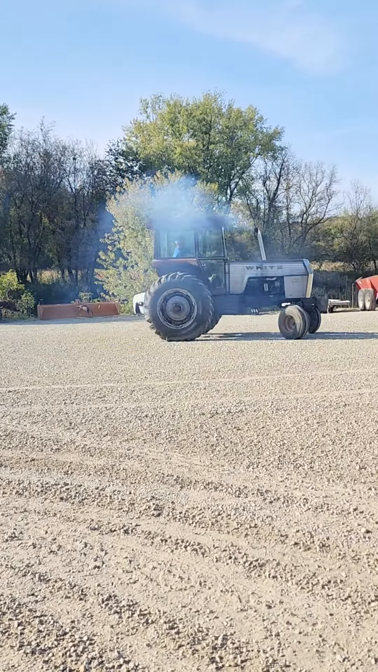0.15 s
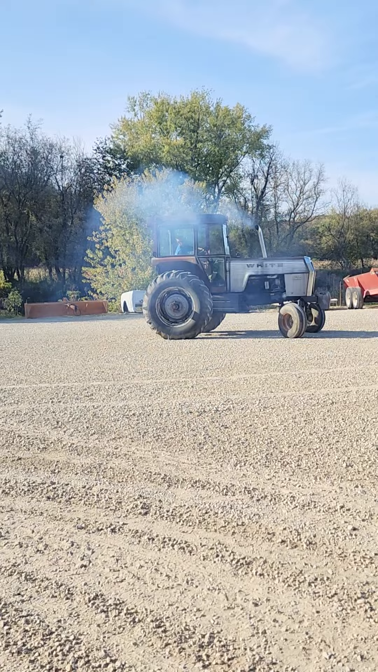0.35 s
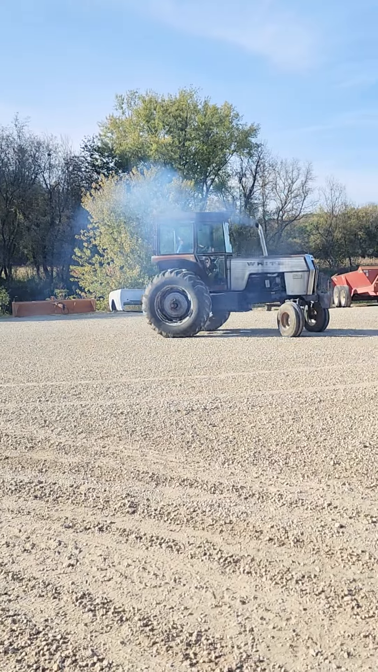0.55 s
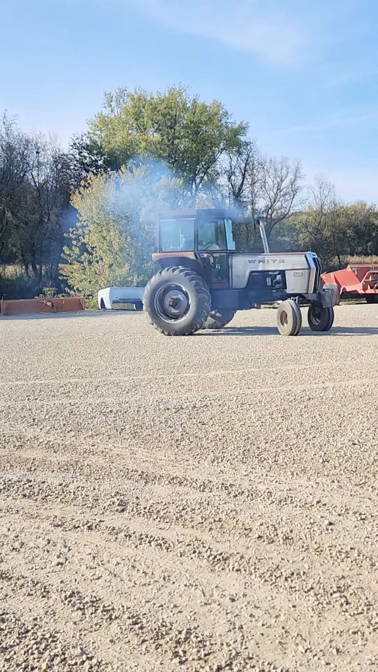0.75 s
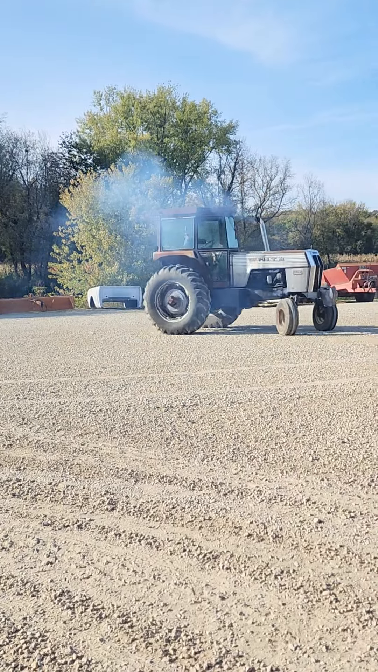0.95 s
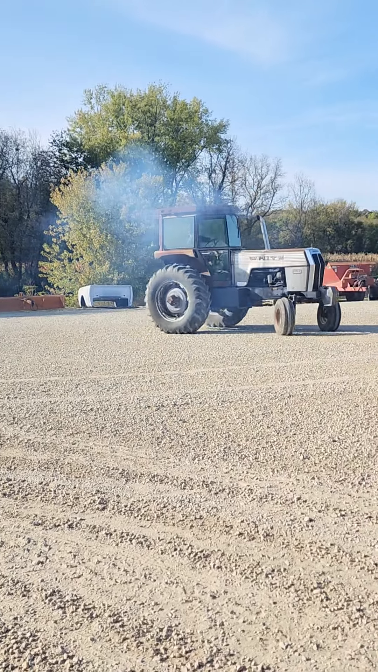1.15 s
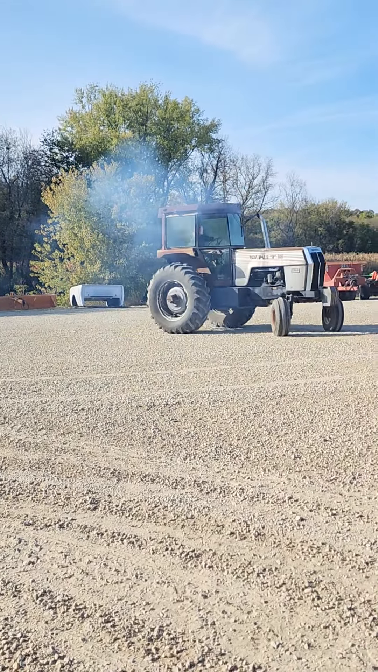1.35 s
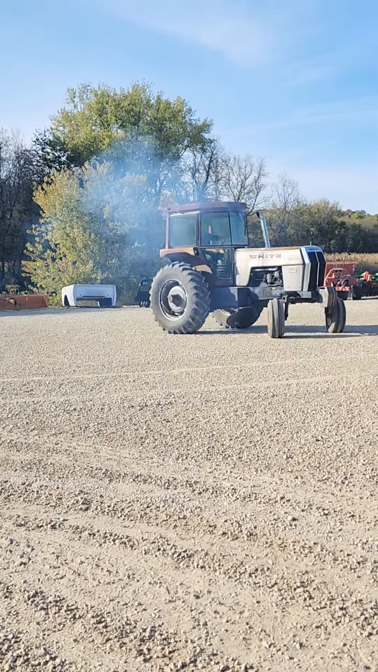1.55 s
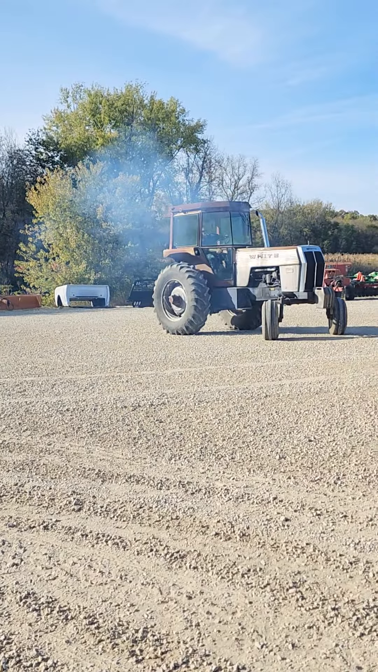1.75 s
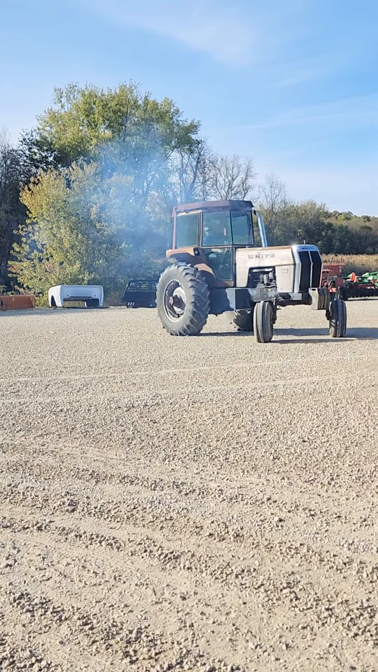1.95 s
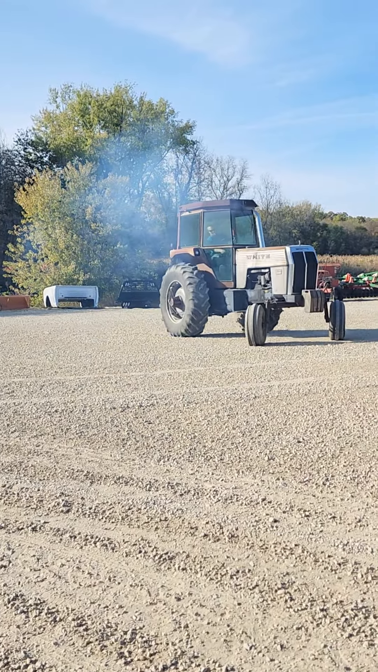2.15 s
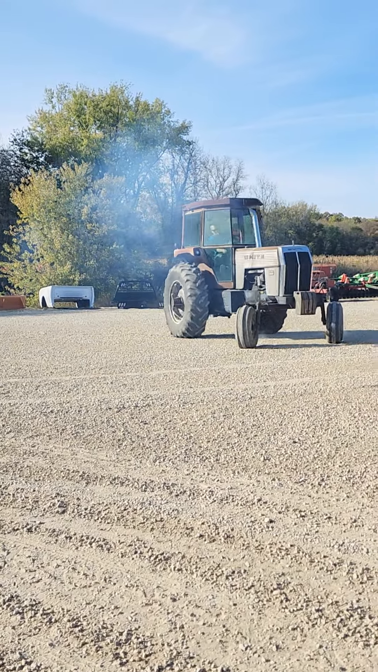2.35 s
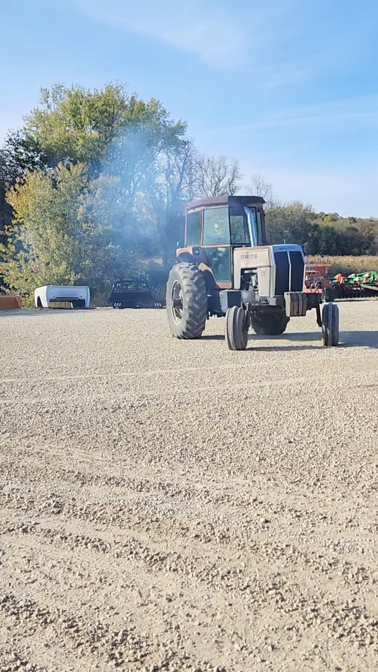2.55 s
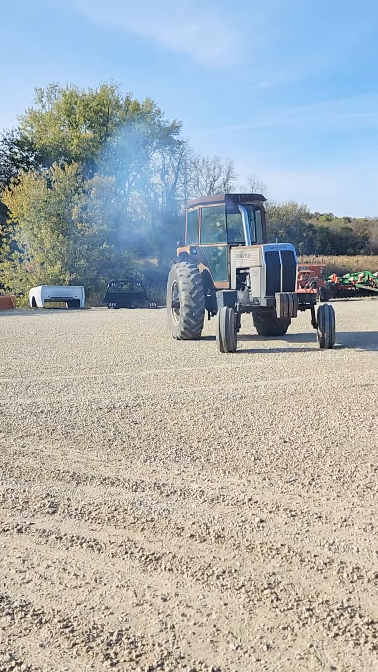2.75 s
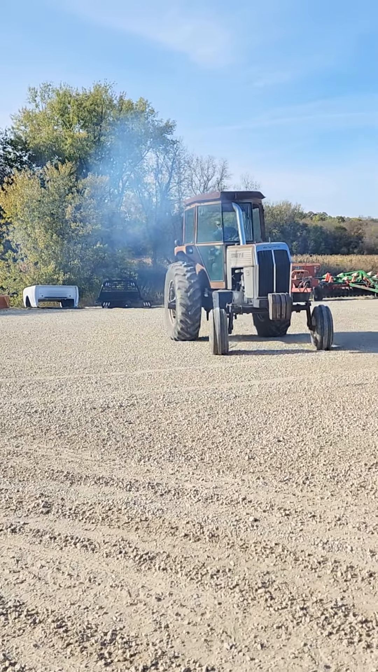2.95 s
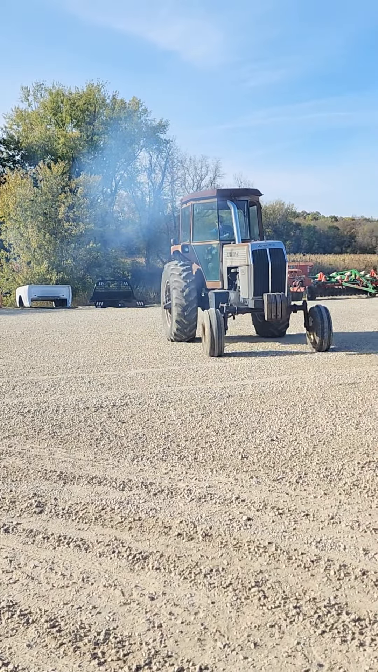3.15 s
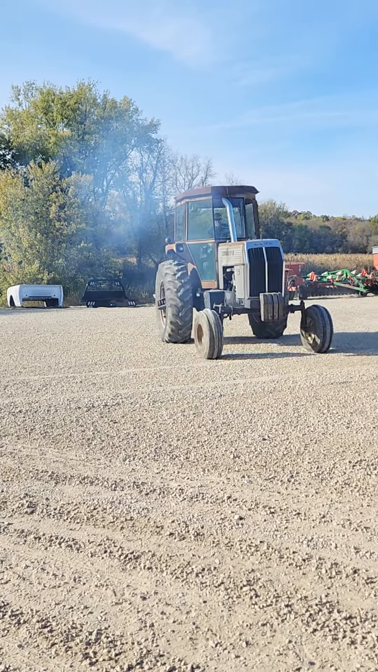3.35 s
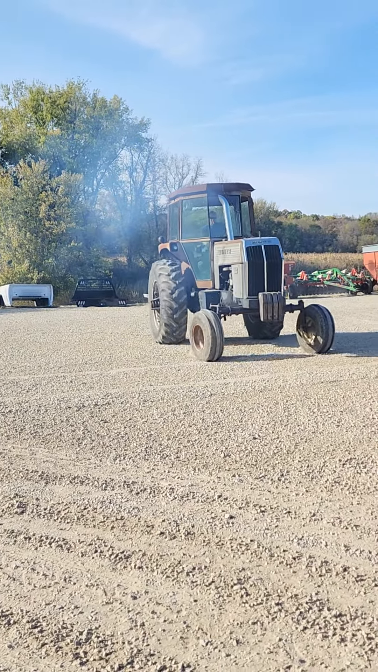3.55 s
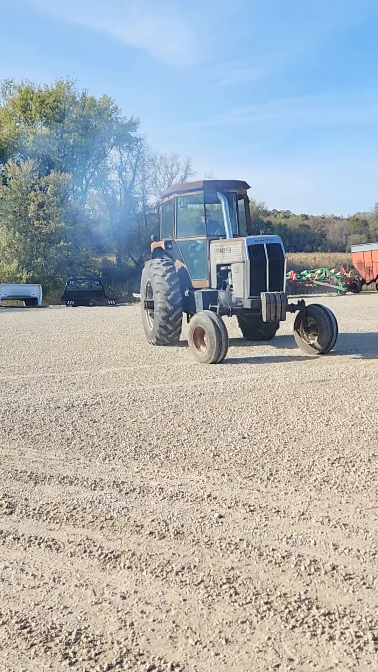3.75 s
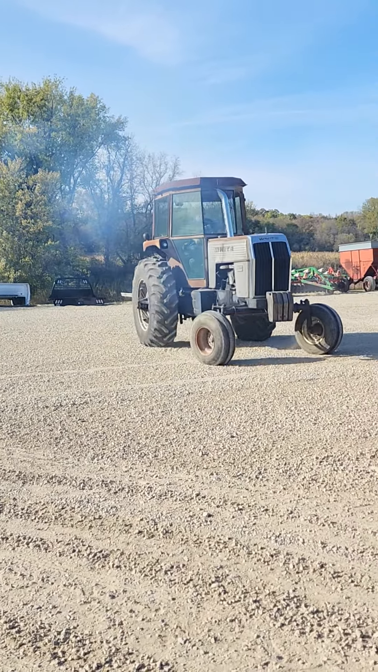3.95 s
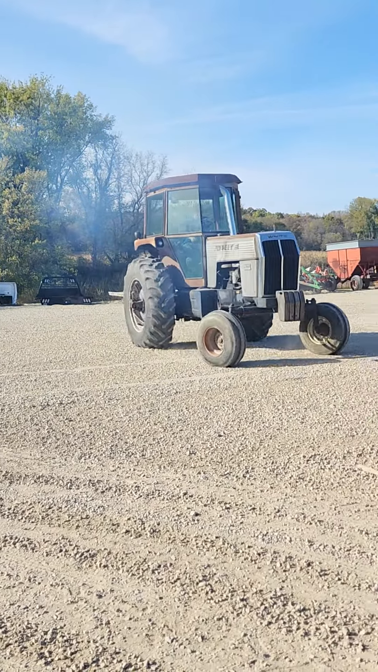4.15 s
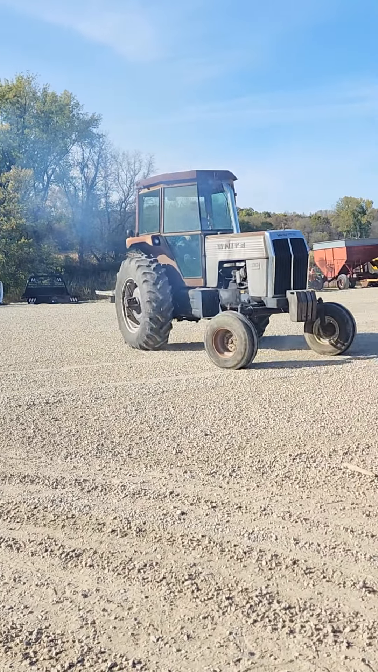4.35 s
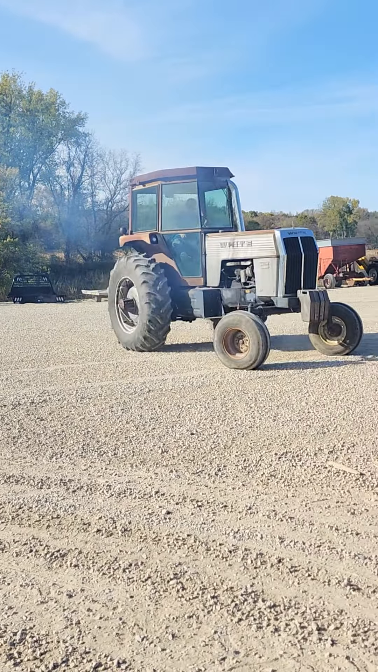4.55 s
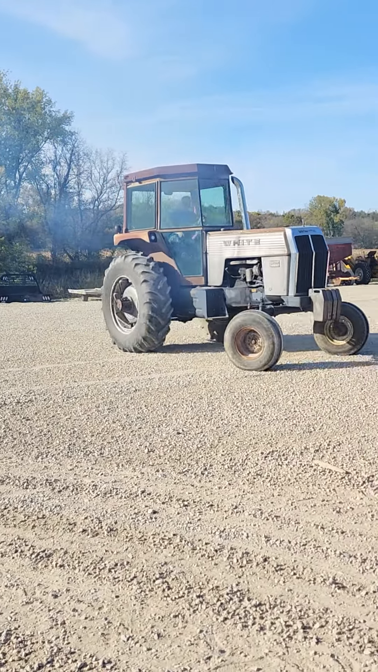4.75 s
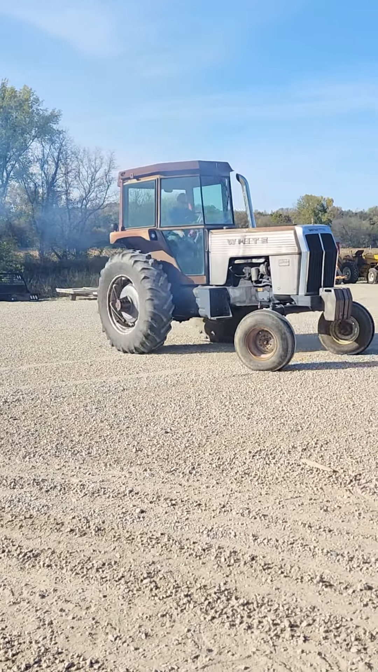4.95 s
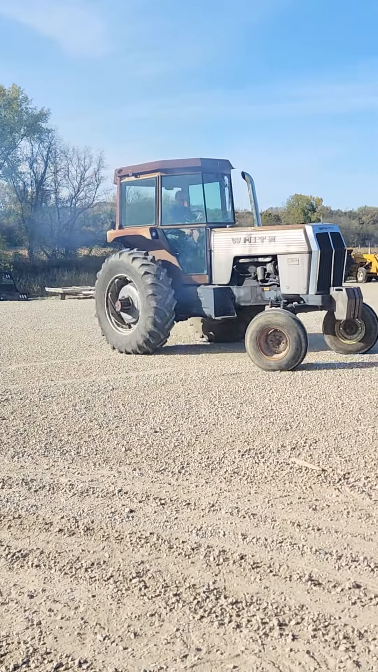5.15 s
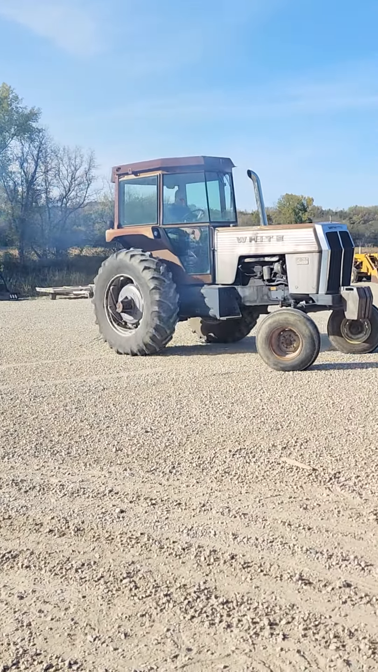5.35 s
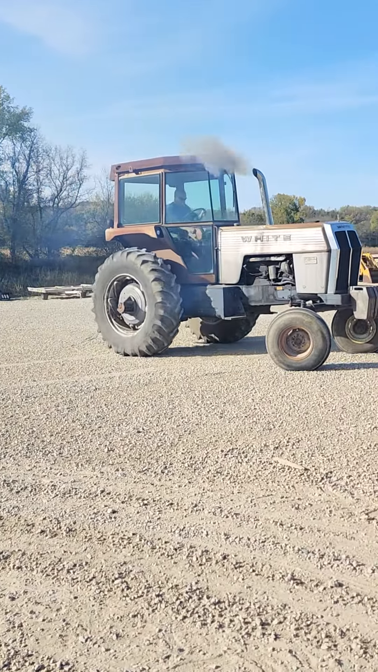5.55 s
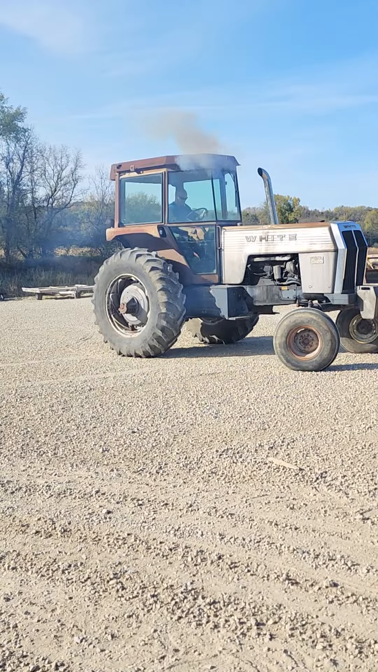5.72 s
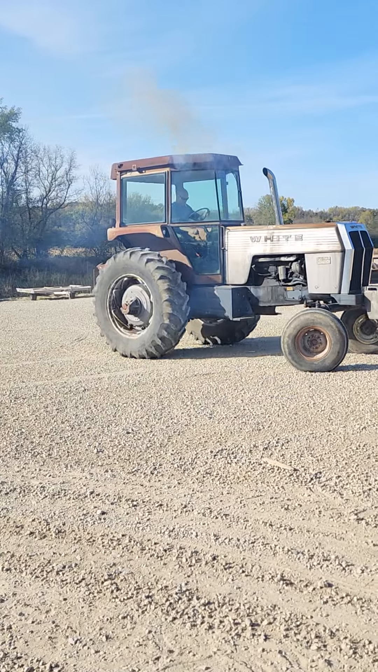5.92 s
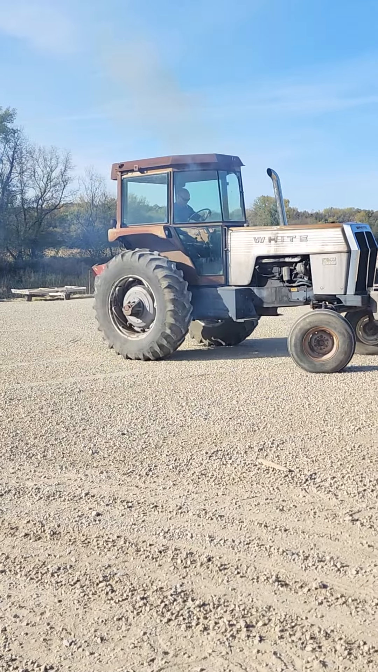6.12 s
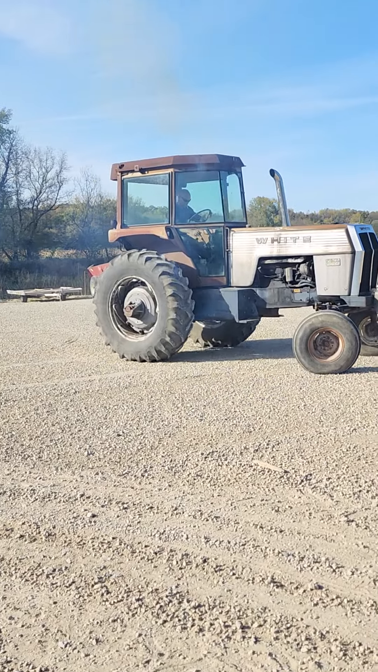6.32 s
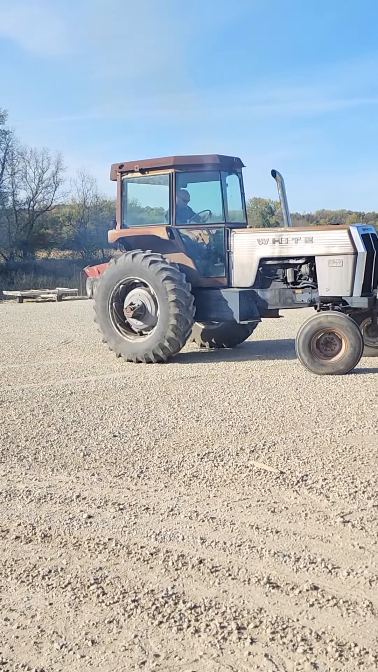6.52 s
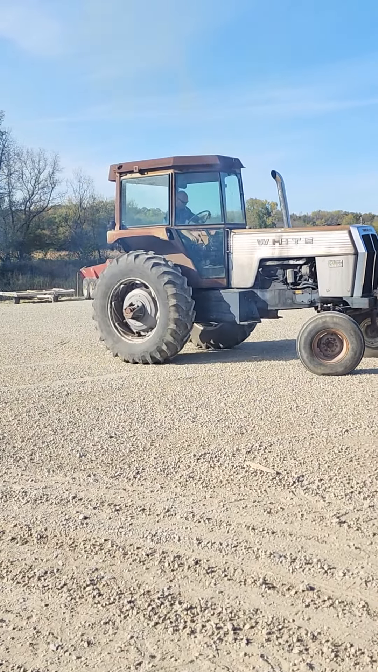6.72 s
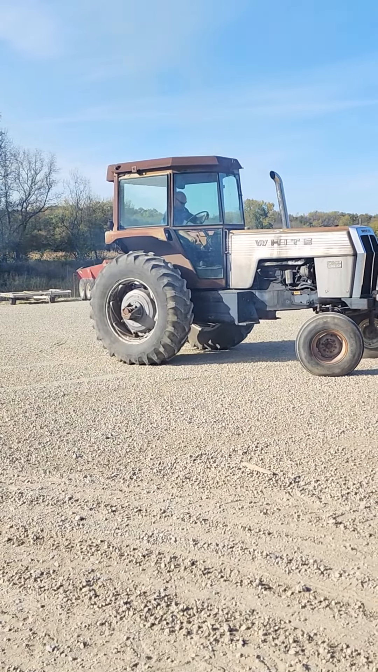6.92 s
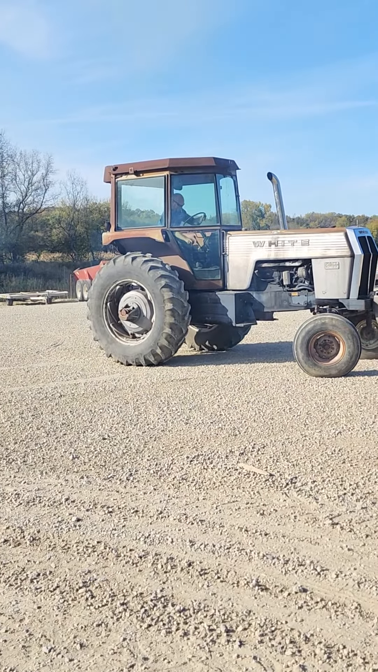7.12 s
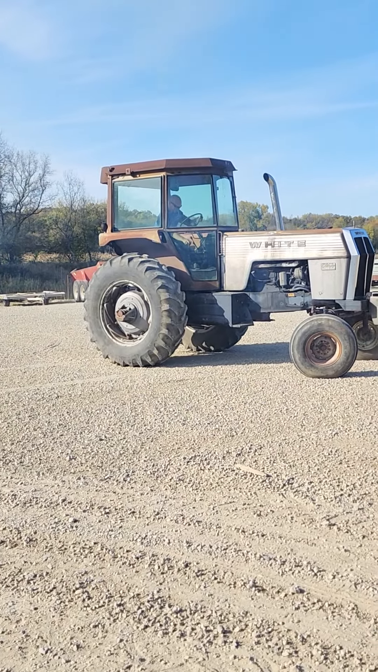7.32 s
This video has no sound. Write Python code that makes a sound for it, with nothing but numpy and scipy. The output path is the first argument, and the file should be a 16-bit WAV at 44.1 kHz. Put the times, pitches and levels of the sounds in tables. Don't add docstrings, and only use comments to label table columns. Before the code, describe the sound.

Outdoors, a steady loud diesel drone with hissing, spitting exhaust gas, a short rev, then falling engine pitch and a whine winding down.

```python
import sys
import numpy as np
from scipy import signal
from scipy.fft import rfft, irfft, next_fast_len
from scipy.io import wavfile
from scipy.ndimage import uniform_filter1d, map_coordinates

SR = 44100
rng = np.random.default_rng(int(sys.argv[2]) if len(sys.argv) > 2 else 0)


def voltage_ratio(decibels):
    exponent = np.asarray(decibels, float) / 20
    return 10 ** exponent


def put_to_file(sound):
    columns = np.atleast_2d(sound).T
    safe = np.clip(columns, -1, 1)
    whole_steps = np.round(safe * 32767)
    wavfile.write(sys.argv[1], SR, whole_steps.astype(np.int16))


N = 329868
T = np.arange(N) / SR

# time in seconds, firing rate in Hz.
FIRING_RATE = [(0, 82.7), (.4, 81.9), (.9, 82.3), (2.4, 82.15), (3, 82.9), (4.2, 83.05), (4.55, 84.4),
               (5.1, 84.4), (5.38, 85.5), (5.5, 93.5), (5.6, 97.8), (5.72, 99.5), (6.15, 76.3),
               (6.45, 63.3), (6.75, 54.5), (7, 49), (7.2, 48.45), (7.48, 49.86)]
# time in seconds, nearness and effort in dB,
# open flank towards the phone (0-1 or a little over), coasting (0-1).
LOAD = [(0, -24, 0.63, 0), (.6, -23.5, 0.86, 0.23), (1.1, -24.5, 0.92, .12), (1.7, -24.5, 0.94, 0.2),
        (2.4, -25, 0.53, 0), (3.2, -24.5, 0.22, 0.17), (4, -23, 0.45, 0.03), (4.8, -22.5, 0.32, 0.42),
        (5.3, -22.5, 0.77, 0.34), (5.38, -23, .5, 0.43), (5.45, -21.5, 1.2, .2), (5.56, -28.5, 1.4, 0),
        (5.65, -25.5, 0.98, 0.9), (6, -25.5, .8, 0.93), (6.45, -30.5, 0.56, 0.97), (6.75, -31, 0.54, 0.97),
        (7.05, -33, 0.6, 0.83), (7.47, -31, 0.52, 0.8)]
CYLINDER_PUFF_DB = [-1, 1, 0, 2, 3, -1]


def evened(x):
    return x / np.sqrt(np.mean(x ** 2) + 1e-20)


def read(points, hz):
    f, value = np.transpose(points)
    return np.interp(np.log(hz + 1), np.log(f + 1), value)


def curves(rows):
    s, *columns = np.transpose(rows)
    return [np.interp(T, s, column) for column in columns]


def noise():
    return rng.standard_normal(N)


def colour(x, points):
    size = next_fast_len(N)
    gain = voltage_ratio(read(points, np.fft.rfftfreq(size, 1 / SR)))
    return evened(irfft(rfft(x, size) * gain, size)[:N])


def wander(hz):
    knots = rng.standard_normal(2000)
    coarse = T[::32]
    drift = map_coordinates(knots, [coarse * 2 * hz], order=3)
    return np.interp(T, coarse, evened(drift))


def resonate(x, hz, width):
    pole = np.exp((2j * hz - width) * np.pi / SR)
    return evened(signal.lfilter([1], [1, -pole], x).real)


def crank():
    return -.445 + np.cumsum(curves(FIRING_RATE)[0]) / SR


def slowing():
    return np.log2(curves(FIRING_RATE)[0] / 83)


def valve_gate(late, pattern_db, scatter_db, fall):
    turns = crank() - late + 6
    firing, part = turns.astype(int), turns % 1
    chance_db = scatter_db * rng.standard_normal(2000)[firing]
    size = voltage_ratio(np.asarray(pattern_db)[firing % 6] + chance_db)
    return evened(size * (1 - np.exp(-part / .09)) * np.exp(-part / fall))


def bump():
    s, db, length_s = .405, -6, 0.0026
    return voltage_ratio(db) * np.exp(-((T - s) / length_s) ** 2)


def roar():
    # frequency in Hz, level in dB.
    roar_colour = [(20, -37), (45, -26), (80, 3), (150, 1), (220, -3), (330, -8), (500, -10.5), (900, -44)]
    level_db, flank, coasting = curves(LOAD)
    scrub = np.clip((T - 1.54) / 0.34, 0, 1)
    level_db = level_db - 4 - 0.5 * flank - 2 * coasting + 3.5 * scrub
    return voltage_ratio(level_db + 0.81 * wander(6)) * colour(noise(), roar_colour)


def fan():
    order = 1.557
    level = voltage_ratio(-33 - 23 * abs(slowing()) + 0.9 * wander(0.93))
    return np.sqrt(2) * level * np.cos(2 * np.pi * order * crank() + 1.2)


def block():
    knock_db = [-1, -1, -2, 1, 4, 1]
    # frequency in Hz, level in dB.
    loaded_colour = [(200, -7), (350, -6), (480, -4), (650, 1.5), (1000, -1), (1230, -8), (1570, -1),
                     (1800, -9), (2070, -8.5), (2500, -10), (3000, -20), (4000, -9), (7000, -49)]
    # frequency in Hz, level in dB.
    coasting_colour = [(200, -3), (350, -9.5), (480, -0.5), (650, -3), (1000, 0.5), (1230, -18),
                       (1500, 4.5), (1800, -13.5), (2070, -9.5), (2400, -16.5), (3000, -10.5), (3700, -9.5),
                       (5000, -15.5), (8000, -30)]
    # frequency in Hz, width in Hz, level against the clatter in dB, time of its peak in
    # seconds, spread in seconds.
    panels = [(300, 45, -15, 2.5, 1.3), (650, 5.3, -8, 3.56, 0.92), (666, 79, -14, 2, 1.4),
              (926, 8.9, -11, 0.69, 0.66), (1010, 2.8, -12.5, 4, 1.5), (1122, 17.8, -15, 4.6, 2.9),
              (1640, 24, -29, 7.43, 0.56), (1425, 22, -10, 6.24, 0.26), (2076, 21, -13, 7.1, 4),
              (2114, 54, -12.5, 1.6, 1.3), (2440, 160, -9, 0.19, 0.66), (593, 12.4, -10, 6.3, 1.4),
              (970, 210, -16, 7.13, 0.37), (371, 6.6, -6, 6.7, 0.11), (3900, 140, -11, 6.3, 0.6),
              (4400, 120, -12, 5.8, 0.65), (4970, 44, -12, 6.1, 1.4), (4400, 200, -4.5, 0.8, 0.62),
              (149.4, 15, -3, 6.9, 0.57), (318, 9, -6, 3.3, 1.15), (2540, 140, -20, 7.3, 0.47)]
    clatter_db, _, coasting = curves(LOAD)
    gate = .75 + .37 * valve_gate(.35, knock_db, 2, .5)
    fresh = noise()
    cycle_part = crank() / 6 % 1
    alike = rng.standard_normal(3200)[(cycle_part * 3200).astype(int)]
    share = .35 * (1 - coasting)
    knock = gate * (np.sqrt(1 - share) * fresh + np.sqrt(share) * alike)
    out = (1 - coasting) * colour(knock, loaded_colour) + coasting * colour(knock, coasting_colour)
    for hz, width, db, s, spread in panels:
        facing = np.exp(-((T - s) / spread) ** 2)
        out += voltage_ratio(db) * facing * resonate(knock, hz, width)
    return voltage_ratio(clatter_db - 0.01 + 0.66 * wander(9)) * out


def hiss():
    # frequency in Hz, level in dB.
    hiss_colour = [(1200, -7), (2100, -5), (3000, -28), (3700, -14.5), (4500, -2), (5200, -2.5),
                   (5800, -2.5), (6500, -10), (7500, -11), (8500, -14), (10000, -23), (12000, -15),
                   (15600, -28), (16000, -60)]
    level_db, flank, coasting = curves(LOAD)
    level_db = level_db - 15.5 + 11 * flank
    chopped = np.clip(0.99 - 0.27 * T, .45, 1) * (1 - 0.69 * coasting)
    gate = 1 - chopped + chopped * valve_gate(.45, CYLINDER_PUFF_DB, 1.4, .45)
    return voltage_ratio(level_db + 0.74 * wander(8.6)) * colour(gate * noise(), hiss_colour)


def leaks():
    leaking_firing, db, scatter_db, until_s = 3.5, -21, 1, 5.35
    cycles = np.floor((crank() - leaking_firing) / 6)
    s = T[1:][np.diff(cycles) > 0]
    chance = rng.standard_normal((200, 2))[:len(s)]
    ring_hz = np.where(chance[:, 1] > 0, 4470, 5800)
    rows = np.c_[s, db + scatter_db * chance[:, 0], ring_hz]
    return list(rows[s < until_s])


def spits():
    # start in seconds, peak in dB, ring in Hz.
    loud_spits = [(0.0724, -11.5, 4290), (0.2199, -15, 4150), (0.2683, -19, 4140), (0.372, -10, 4400),
                  (0.4244, -12, 4390), (0.4873, -16, 5300), (0.5706, -15, 4530), (0.64, -9.5, 4460),
                  (0.7068, -10.5, 4400), (0.779, -9, 4400), (0.852, -19, 5000), (0.9737, -9, 4730),
                  (1.145, -9, 5440), (1.2166, -13, 4320), (1.2915, -16, 4160), (1.362, -9.5, 5870),
                  (1.509, -9, 4760), (1.5836, -12.5, 5800), (1.6546, -17, 5700), (1.702, -14, 5740),
                  (1.849, -17.5, 5730), (2.093, -13.5, 6300), (2.676, -18, 5810), (2.821, -16.5, 5940),
                  (3.4735, -19, 5820), (3.8127, -16.5, 5800), (3.9806, -17, 5770), (4.136, -22, 5770),
                  (4.3286, -17.5, 5850), (5.3103, -12, 5420)]
    # frequency in Hz, level in dB.
    spit_colour = [(900, -12), (2000, -6.5), (3100, -17), (4500, 2.5), (6000, -4), (7500, -15.5),
                   (10000, -21), (15600, -14), (16000, -60)]
    out = np.zeros(N)
    t = np.arange(2600) / SR
    swell = (1 - np.exp(-t / 0.0006)) * np.exp(-(t / 0.022) ** 2)
    air = colour(noise(), spit_colour)
    for s, db, hz in list(loud_spits) + leaks():
        at = round(s * SR)
        puff = air[at:at + len(t)]
        puff = puff + .6 * resonate(puff, hz, 450)
        out[at:at + len(t)] += voltage_ratio(db - 14.5) * swell * puff
    return out


def rush():
    # time in seconds, level in dB.
    rush_level = [
        (5.403, -70),
        (5.408, -14.5),
        (5.45, -17.5),
        (5.5, -19.5),
        (5.545, -21),
        (5.58, -28),
        (5.65, -53),
    ]
    # frequency in Hz, level in dB.
    rush_colour = [(500, -7.5), (1000, -4.5), (2000, -8.5), (3000, -11.5), (3600, -30), (4300, -7.5),
                   (5500, -2), (7000, -17), (10000, -18), (15600, -20.5), (16000, -60)]
    is_open = (T > 5.403) * (T < 5.65)
    level = voltage_ratio(curves(rush_level)[0] + 0.54 * wander(60)) * is_open
    return level * colour(noise(), rush_colour)


def turbo():
    # time in seconds, blade tone in Hz, level in dB.
    whistle = [(0, 4330, -27), (.9, 4510, -33), (1.1, 5870, -36), (2.5, 5850, -38), (4.5, 5700, -34.5),
               (5, 5450, -33), (5.39, 5250, -27.5), (5.42, 5200, -25), (5.5, 6150, -16), (5.57, 6470, -30),
               (5.7, 6400, -37.5), (6.05, 5980, -34), (6.25, 5690, -33.5), (6.4, 5350, -34.5),
               (6.65, 4950, -36), (6.95, 4400, -37.5), (7.25, 3990, -35), (7.48, 3700, -38)]
    # time in seconds, fuzz in Hz.
    unsteadiness = [
        (.9, 300),
        (1.1, 167.2),
        (5.39, 172.6),
        (5.42, 111),
        (5.5, 110),
        (5.7, 40.1),
    ]
    (hz, db), (fuzz,) = curves(whistle), curves(unsteadiness)
    angle = 2 * np.pi * np.cumsum(hz + fuzz * wander(120)) / SR
    first_fade_s, period_s, depth_db = 6.5, 0.304, 3.1
    flutter = np.cos(2 * np.pi * (T - first_fade_s) / period_s) * (T > first_fade_s - period_s / 4)
    db = db - depth_db * flutter
    pumped = 0.23 + .5 * valve_gate(0.72, CYLINDER_PUFF_DB, 0.72, 0.28)
    pumped = np.where(T > 5.7, .7 + .3 * pumped, pumped)
    octave = voltage_ratio(-13 + np.minimum(hz - 6000, 0) / 40) * (T > 5.65)
    tone = np.cos(angle) + octave * np.cos(2 * angle)
    return np.sqrt(2) * voltage_ratio(db + 2.3 * wander(30)) * pumped * tone


def half_order_db():
    loaded = -22 - T
    slowed = -29 + 13 * np.minimum(slowing(), 0)
    half = np.where(T > 5.57, slowed, loaded)
    stumble = np.exp(-((T - 5.32) / .055) ** 2)
    return half + (-18 - half) * stumble


def stack():
    # time in seconds, firing tone in dB,
    # bite of the pulses (octave against the firing tone) in dB.
    boom = [(0, -14.5, -2.5), (.5, -13, -5.5), (1.75, -14.5, -6), (3, -15.5, -2.5), (3.75, -14.5, -1),
            (4.25, -14, -4.5), (4.5, -12, -11.5), (5.28, -11.5, -16.5), (5.36, -15, -20),
            (5.42, -11.5, -24), (5.5, -12, -6.5), (5.69, -14, -14), (5.74, -26, -4.5), (6.3, -30, 1),
            (6.55, -34, 9.5), (6.75, -35.5, 10), (6.97, -32, 2), (7.07, -28.5, -3.5)]
    # order in sixths of the firing rate,
    # level against the clatter in dB.
    uneven = [(3, -28), (4, -17.5), (5, -19.5), (7, -28), (8, -21.5), (10, -44), (11, -19), (13, -18.5),
              (14, -9.5), (15, -11), (16, -12.5), (17, -19.5), (18, -15.5), (21, -20.5), (22, -16.5),
              (24, -16)]
    angle = 2 * np.pi * crank()
    first, bite = curves(boom)
    second = first + bite
    clatter_db, _, coasting = curves(LOAD)
    loose = 1 + 1.66 * coasting
    out = voltage_ratio(first + 0.75 * loose * wander(14)) * np.cos(angle + 0.053 * wander(10))
    half_level = voltage_ratio(half_order_db() + 1.3 * loose * wander(9))
    out += half_level * np.cos(3 / 2 * angle - .2 + .15 * wander(8))
    second_phase = .9 + 2 * (1 - coasting) + .1 * wander(8)
    out += voltage_ratio(second + 1.1 * loose * wander(12)) * np.cos(2 * angle + second_phase)
    for sixth, db in uneven:
        level = voltage_ratio(clatter_db + db - 2.0 * coasting + 4.3 * wander(4))
        out += level * np.cos(sixth / 6 * angle + sixth % 6 + 0.66 * loose * wander(3))
    return np.sqrt(2) * out


def scene():
    air = roar() + fan() + hiss() + spits() + rush()
    return np.tile(bump() + air + block() + turbo() + stack(), (2, 1))


def low_pass(x):
    return signal.sosfilt(signal.butter(12, 16000, fs=SR, output="sos"), x)


def record(dry):
    # frequency in Hz, likeness (0-1).
    likeness = [(60, 0.96), (170, 1), (340, 0.9), (700, 0.66), (1500, 0.42), (3000, 0.46), (6000, 0.33),
                (15000, 0.12)]
    # frequency in Hz, left minus right in dB.
    tilt = [(100, 5.5), (170, -2.5), (350, -1), (700, 1.5), (1300, -1), (2400, -0.5), (4400, -3.5),
            (8100, 2.5), (15000, -2.5)]
    # time in seconds, lead of the left port in ms.
    left_lead = [(0, 0.13), (2.5, 0.14), (4, .14), (5.5, 0.15), (7.48, .15)]
    hz, t, z = signal.stft(dry[0], SR, nperseg=256, noverlap=192)
    same = read(likeness, hz)[:, None]
    drift = rng.standard_normal((len(t), len(hz), 2)).T
    drift = uniform_filter1d(uniform_filter1d(drift, size=3, axis=2), size=3, axis=1)
    scattered = np.exp(1j * np.angle(drift[0] + 1j * drift[1]))
    treble = np.clip((hz[:, None] - 700) / 2300, 0, 1)
    lead_s = np.interp(t, *np.transpose(left_lead)) / 1000 * treble
    apart = voltage_ratio(read(tilt, hz)[:, None] / 2) * np.exp(1j * np.pi * hz[:, None] * lead_s)
    common = np.sqrt((1 + same) / 2)
    own = np.sqrt((1 - same) / 2) * scattered
    pair = np.array([z * (common + own) * apart, z * (common - own) / apart])
    x = signal.istft(pair, SR, nperseg=256, noverlap=192)[1][:, :N]
    side = signal.sosfiltfilt(signal.butter(2, 65, "high", fs=SR, output="sos"), x[0] - x[1])
    x = (x.sum(0) + np.array([side, -side])) / 2
    x = signal.sosfilt(signal.butter(2, 28, "high", fs=SR, output="sos"), x)
    treble_cut = signal.firwin(255, 16300, fs=SR)[None]
    x = signal.oaconvolve(np.clip(x, -1, 1), treble_cut, "same")
    return low_pass(x)


dry = scene()
out = record(dry)
put_to_file(out)
```